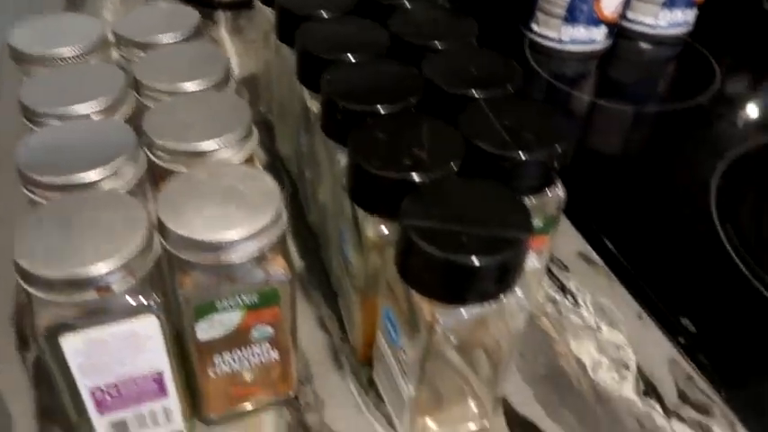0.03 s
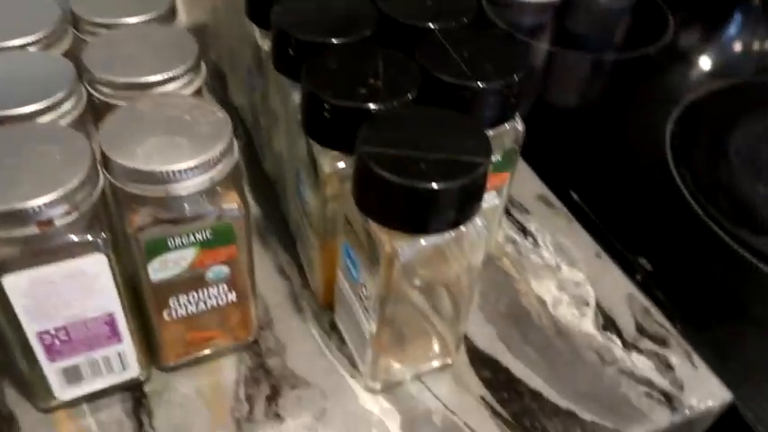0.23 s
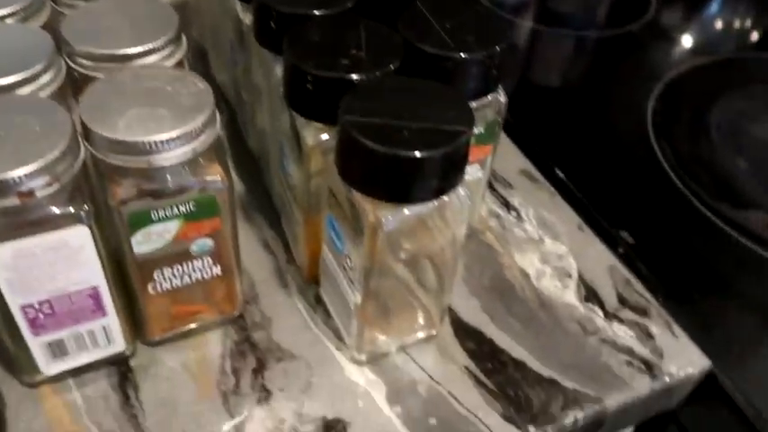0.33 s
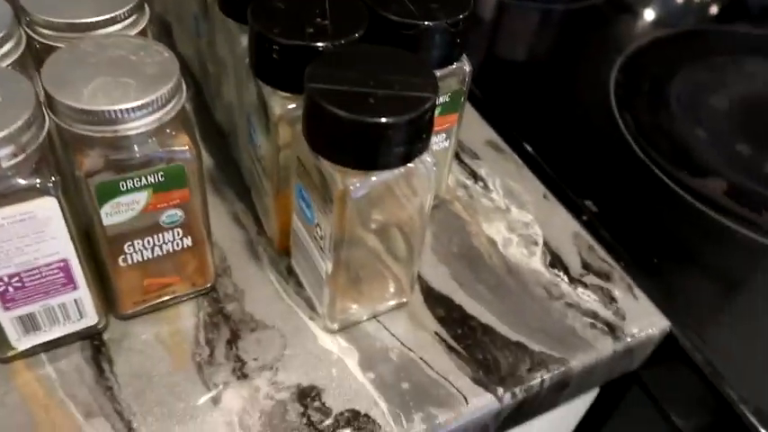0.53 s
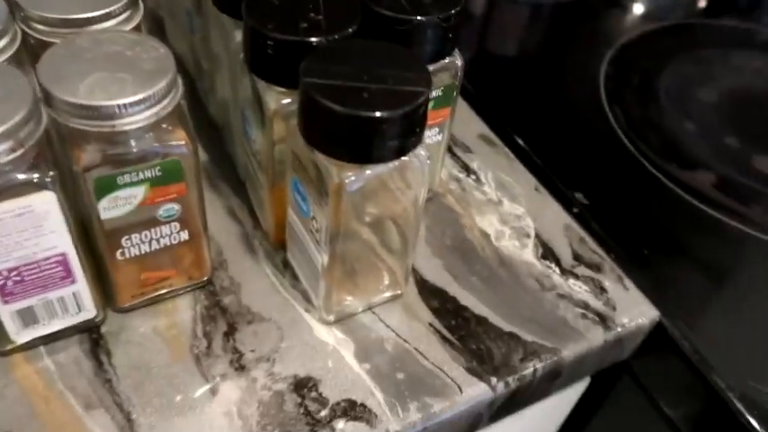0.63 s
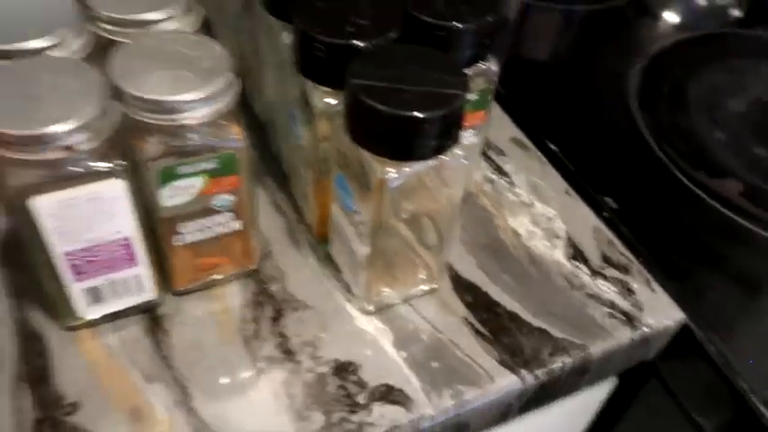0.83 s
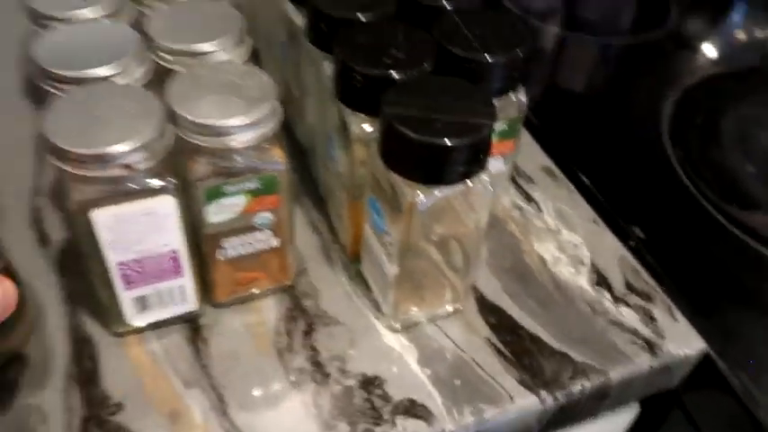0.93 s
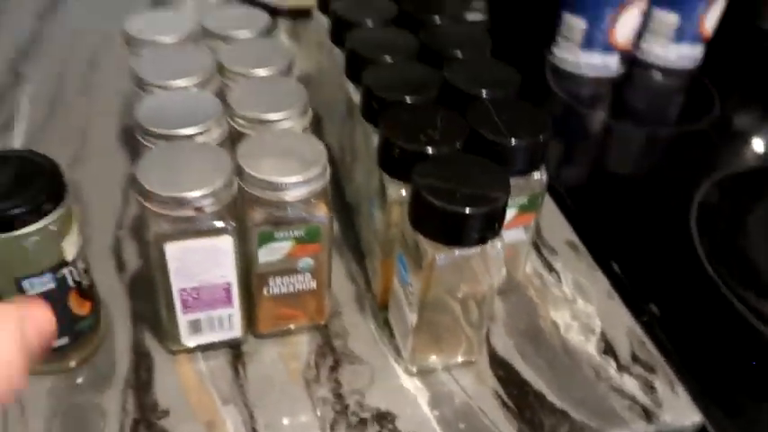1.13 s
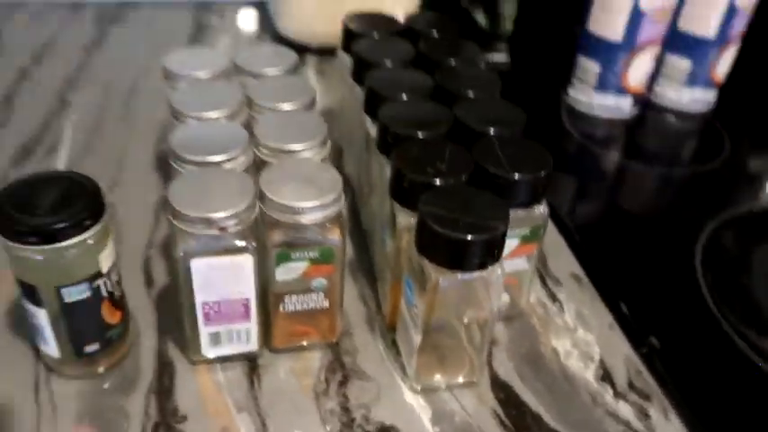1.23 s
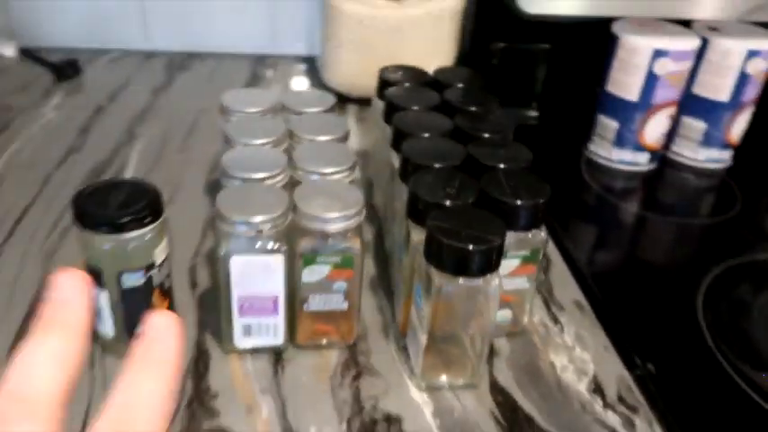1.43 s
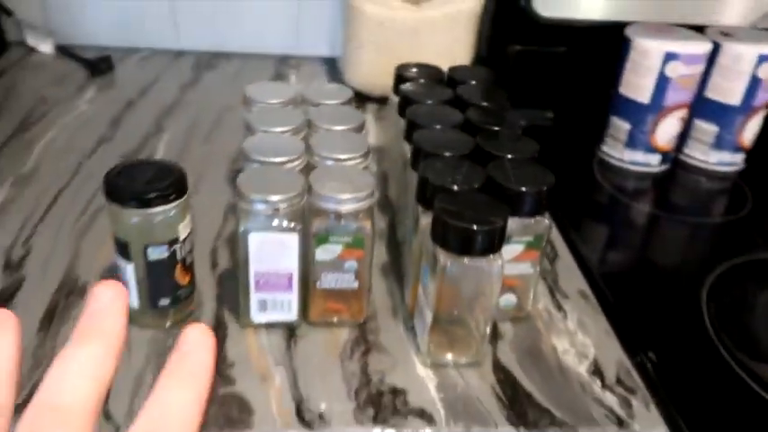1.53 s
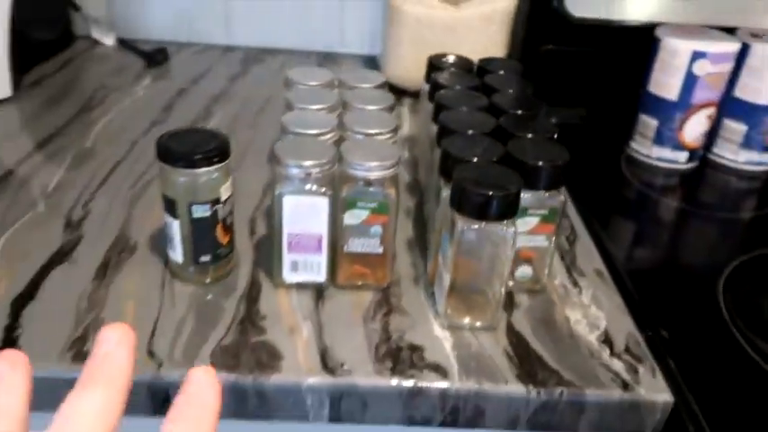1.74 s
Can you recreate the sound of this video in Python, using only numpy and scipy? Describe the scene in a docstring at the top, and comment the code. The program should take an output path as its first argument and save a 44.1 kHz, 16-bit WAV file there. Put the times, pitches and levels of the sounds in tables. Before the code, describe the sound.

Small glass jars are set down on a hard kitchen countertop, close to the microphone. A strong, dull knock comes at 0.25 s, the loudest, slightly distorted, at 0.48, a very faint one at 0.78, and a moderate, clinkier one at 1.05. Each is a tight double contact with a tiny rock. Short room reverberation fades into soft hiss and low hum until 1.8 s, where a faint low tone begins.

```python
"""Small glass jars are set down on a kitchen countertop, four knocks close to the microphone.
Each jar touches with an edge, lands flat a few milliseconds later and rocks once. Decaying sines ring the
counter; short bursts of coloured noise make its clack and the clink and tick of the glass.
Decaying noise makes the kitchen's reverberation, over microphone hiss, mains hum, tiny high ticks and, at
the very end, a low tone that swells in. The hardest knock overloads the recorder."""
import sys
import numpy as np
from scipy import signal
from scipy.fft import rfft, irfft, next_fast_len
from scipy.io import wavfile

SR = 44100
rng = np.random.default_rng(int(sys.argv[2]) if len(sys.argv) > 2 else 0)


def generate_wav(sig):
    """Save sig (samples, or channels by samples) to the path in sys.argv[1] as 16-bit PCM at SR."""
    pcm = np.round(np.clip(np.atleast_2d(sig).T, -1, 1) * 32767).astype(np.int16)
    wavfile.write(sys.argv[1], SR, pcm)


N = 79380


def amp(db):
    """Decibels to gain."""
    return 10 ** (np.asarray(db) / 20)


def unit(x):
    """Scale to rms 1."""
    return x / np.sqrt(np.mean(x ** 2) + 1e-20)


def along(points, hz):
    """Read a curve of (Hz, value) points on a log frequency axis."""
    point_hz, values = np.transpose(points)
    return np.interp(np.log(hz + 1), np.log(point_hz + 1), values)


def curve(points):
    """Read a curve of (s, value) points, one value per sample."""
    return np.interp(np.arange(N) / SR, *np.transpose(points))


def filtered(x, response):
    """Filter x by a complex response of frequency."""
    size = 2 * next_fast_len(N // 2 + 4096)
    hz = np.fft.rfftfreq(size, 1 / SR)
    return irfft(rfft(x, size) * response(hz), size)[..., :N]


def causal(gain):
    """The minimum-phase response with this gain, so that nothing sounds before its cause."""
    cepstrum = irfft(np.log(np.maximum(gain, 1e-6)))
    half = len(cepstrum) // 2
    fold = np.r_[1, np.full(half - 1, 2), np.zeros(half)]
    return np.exp(rfft(cepstrum * fold))


def noise(spectrum):
    """Coloured mono noise of rms 1."""
    return unit(filtered(rng.standard_normal(N), lambda hz: amp(along(spectrum, hz))))


def diffuse(spectrum, alike):
    """Coloured stereo noise of rms 1; the mid-side balance sets the left-right likeness."""
    def mid_side_gain(hz):
        turn = np.arccos(np.clip(along(alike, hz), -1, 1)) / 2
        return amp(along(spectrum, hz)) * [np.cos(turn), np.sin(turn)]

    mid, side = filtered(rng.standard_normal((2, N)), mid_side_gain)
    return unit(np.array([mid + side, mid - side]))


def delayed(x, s):
    """x starting s seconds later."""
    return np.pad(x, (max(round(s * SR), 0), 0))[:N]


def strike(x, contacts):
    """x repeated at every (delay s, dB) contact."""
    return sum(amp(db) * delayed(x, s) for s, db in contacts)


def burst(spectrum, db, t60, contacts):
    """A fresh puff of dense, fast-dying resonances, made of noise, at every (delay s, dB) contact."""
    t = np.arange(N) / SR
    return sum(delayed(amp(db + level - 60 * t / t60) * noise(spectrum), s) for s, level in contacts)


def jars():
    """Each jar touches, lands flat and rocks once; the glass speaks at the first two contacts only."""
    # The four knocks. Each row: start in seconds, level in dB, contact cut-off in Hz, cabinet thump in dB,
    # counter ring in dB, jar clink in dB, glass tick in dB, room in dB, left-right difference in dB.
    knocks = [(0.2468, -1, 1014, 2, -5.5, -22, -38, -16, 1.5),
              (.482, 4.5, 1300, 1, -7, -13.5, -25, -17.5, 1.5),
              (.781, -24.5, 1460, 0, -7.5, -11, -34.5, -9, 2),
              (1.053, -10, 1947, -2.5, -1.5, -1.5, -28, -7, 1.5)]
    # The base landing flat. Each row: delay after the first touch in seconds, level against it in dB.
    landings = [(.003, -1.5), (.0023, 0), (.0045, 5), (.0031, -1)]
    # The single rock that follows. Each row: delay after the first touch in seconds, level against it in dB.
    rocks = [(.012, -12), (.0175, -8), (.012, -5), (.0255, -8)]
    out = np.zeros((2, N))
    for knock, land, rock in zip(knocks, landings, rocks):
        start_s, db, contact_hz, thump_db, ring_db, clink_db, tick_db, room_db, pan_db = knock
        touch = (0, 0)
        on_counter = contact(counter([touch, land, rock], ring_db), contact_hz, thump_db)
        close = on_counter + glass([touch, land], clink_db, tick_db)
        pair = direct(close, pan_db) + amp(room_db) * reverberation(close, contact_hz, thump_db)
        out += amp(db) * np.array([delayed(channel, start_s) for channel in pair])
    return out


def counter(contacts, ring_db):
    """Every contact shoves the countertop, rings its well-damped modes and makes a dense clack."""
    # Modes of the countertop under a jar. Each row: frequency in Hz, level in dB, t60 in seconds.
    modes = [(95.7, -16.5, .4), (150, -10, 0.17), (312.2, -17.5, 0.19), (345.4, -10.5, 0.048),
             (446, -12.5, 0.053), (530, -20.5, 0.063), (707, -11.5, .06), (871, -9.5, 0.044),
             (877, -15, .07), (1018, -10.5, 0.0604), (1176.7, -20, 0.089), (1300, -18, .06),
             (1630, -18, 0.058), (1889, -19, 0.037)]
    # Dense short modes heard as a clack. Each row: frequency in Hz, level in dB.
    clack = [(40, -24.5), (150, -10.5), (350, -10.5), (600, 6.5), (900, 18), (1500, -1), (2500, 0),
             (3300, -14), (4500, -11), (9000, -16.5)]
    max_ring_cycles = 75  # no mode takes more cycles than this to fall 60 dB
    t = np.arange(N) / SR
    scatter_db = rng.normal(0, 2, len(modes))  # each knock excites the modes a little differently
    ring = np.zeros(N)
    for (hz, db, t60), offset_db in zip(modes, scatter_db):
        decay_db = -60 * t / min(t60, max_ring_cycles / hz)
        ring += amp(db + offset_db + decay_db) * np.sin(2 * np.pi * hz * t)
    push = amp(14.5) * (t == 0)  # the unringing shove: one sample
    return strike(amp(ring_db) * ring + push, contacts) + burst(clack, db=-4.5, t60=.034, contacts=contacts)


def contact(x, contact_hz, thump_db):
    """A softer contact is duller, a heavier one thumps more; the deepest bass does not radiate."""
    thump_hz, contact_order, low_cut_hz = 420, 2.47, 188

    def gain(hz):
        thump = amp(thump_db / (1 + (hz / thump_hz) ** 4))
        softness = np.sqrt(1 + (hz / contact_hz) ** (2 * contact_order))
        radiation = hz ** 2 / np.sqrt(hz ** 4 + low_cut_hz ** 4)
        return thump / softness * radiation

    return filtered(x, lambda hz: causal(gain(hz)))


def glass(contacts, clink_db, tick_db):
    """The jar, damped by the hand, gives a short clink and a bright tick."""
    # The jar's own short ring. Each row: frequency in Hz, level in dB.
    clink = [(1200, -32), (1800, -3.5), (2480, 7), (3100, -14.5), (3700, -13.5), (4500, -20.5),
             (6000, -56.5)]
    # The bright tick of glass. Each row: frequency in Hz, level in dB.
    tick = [(1000, -28.5), (2500, -2.5), (4500, 4), (5600, -6.5), (7300, -8), (8500, -11.5), (11000, -9),
            (12300, -29.5), (15000, -44)]
    clinks = burst(clink, db=-7.5 + clink_db, t60=.03, contacts=contacts)
    return clinks + burst(tick, db=-7 + tick_db, t60=.03, contacts=contacts)


def direct(x, pan_db):
    """The straight path: the left microphone hears it a little earlier and louder."""
    # Share of the left-right difference. Each row: frequency in Hz, factor.
    shade = [(250, 0), (600, .7), (1500, 1), (4000, 1.8), (8000, .7)]
    left_lead_s = .000036
    sides = np.array([[.5], [-.5]])  # left gets half the lead and level, right the opposite half

    def response(hz):
        level = np.array([causal(amp(side * pan_db * along(shade, hz))) for side in sides])
        return level * np.exp(2j * np.pi * hz * left_lead_s * sides)

    return filtered(x, response)


def reverberation(x, contact_hz, thump_db):
    """The whole counter radiates a broad sound into the room, along with some of the ring."""
    # Colour of the broad sound. Each row: frequency in Hz, level in dB.
    room_colour = [(60, -9.5), (150, 5), (300, -2), (480, -0.5), (750, 4), (1100, 4), (1700, 1),
                   (2500, -4.5), (3500, -9.5), (7000, -12), (11000, -13.5)]
    broad_db, ring_db = 34, -5
    broad = contact(kitchen(), .93 * contact_hz, thump_db)
    broad = filtered(broad, lambda hz: causal(amp(broad_db + along(room_colour, hz))))
    ring = signal.fftconvolve(x[None], kitchen(), axes=1)[:, :N]
    return broad + amp(ring_db) * ring


def kitchen():
    """The room's answer to a click: quick reflections from near surfaces, then a tail whose treble dies first."""
    # Decay of the tail. Each row: frequency in Hz, t60 in seconds.
    room_t60 = [(90, .5), (300, .52), (900, 0.54), (2000, 0.56), (4000, 0.45), (10000, 0.087)]
    # Stereo width of the reverberation. Each row: frequency in Hz, left-right likeness.
    room_alike = [(150, .999), (500, .98), (1000, 0.97), (2000, .85), (4000, 0.7), (10000, 0.071)]
    # Flat spectrum. Each row: frequency in Hz, level in dB.
    white = [(20, 0), (20000, 0)]
    early_db, early_t60_s, build_s = 12, .12, .007
    hz, frame_s, bins = signal.stft(diffuse(white, room_alike), SR, nperseg=256)
    decay = amp(-60 * frame_s / along(room_t60, hz)[:, None])
    tail = signal.istft(bins * decay, SR, nperseg=256)[1][:, :N]
    t = np.arange(N) / SR
    early = diffuse(white, room_alike) * amp(early_db - 60 * t / early_t60_s)
    answer = (tail + early) * (1 - np.exp(-t / build_s))
    return answer / np.linalg.norm(answer[0])


def flecks():
    """Very faint, unevenly spaced high ticks: short decays of narrow-band noise."""
    per_s, t60_s, db = 14, .025, -65
    centre_hz, width_hz = 4350, 550
    t = np.arange(N) / SR
    times = np.cumsum(rng.uniform(.3, 1.7, size=40)) / per_s
    envelope = strike(amp(-60 * t / t60_s), [(s, db) for s in times])
    band = filtered(rng.standard_normal((2, N)), lambda hz: np.exp(-.5 * ((hz - centre_hz) / width_hz) ** 2))
    return envelope * unit(band)


def low_tone():
    """A faint low sine swells in over the last few hundredths of a second, under a cosine window."""
    peak_s, length_s, tone_hz = 1.8, .088, 348  # the peak falls at the end, so only the rise is heard
    t = np.arange(N) / SR - peak_s
    swell = np.cos(np.pi * np.clip(t / length_s, -.5, .5))
    return amp(-50.5) * swell * np.sin(2 * np.pi * tone_hz * t)


def background():
    """Microphone hiss as wide coloured noise and mains hum as a sine, both riding one level curve."""
    # Colour of the hiss. Each row: frequency in Hz, level in dB per Hz (relative).
    hiss = [(25, -5.5), (60, -5), (110, -5), (200, -9.5), (340, -2.5), (500, -12), (1000, -13),
            (2000, -16.5), (3300, -23), (4500, -23.5), (6000, -29.5), (10000, -36), (12500, -39.5),
            (15000, -57)]
    # Stereo width of the hiss. Each row: frequency in Hz, left-right likeness.
    hiss_alike = [(60, 1), (100, .93), (200, 0.36), (500, .05), (10000, .02)]
    # Level of the background, dipping after the first two knocks. Each row: time in seconds, level in dB.
    background_swell = [(0, -0.5), (.23, 1.5), (.27, -6), (.46, 1), (.56, -12.5), (1.0, -10), (1.35, -8),
                        (1.55, -6), (1.78, -5.5)]
    hiss_db, hum_db, hum_hz = -51, -53.5, 59.5  # both levels before the curve
    hum = amp(hum_db) * unit(np.sin(2 * np.pi * hum_hz * np.arange(N) / SR))
    return amp(curve(background_swell)) * (amp(hiss_db) * diffuse(hiss, hiss_alike) + hum)


def scene():
    """The knocks in the quiet kitchen."""
    return jars() + flecks() + low_tone() + background()


def record(dry):
    """The recorder rounds off the highest peaks and keeps nothing above its band limit."""
    ceiling, hardness, top_hz = .98, 6, 15300
    clipped = dry / (1 + np.abs(dry / ceiling) ** hardness) ** (1 / hardness)
    return filtered(clipped, lambda hz: hz < top_hz)


dry = scene()
out = record(dry)
generate_wav(out)
```